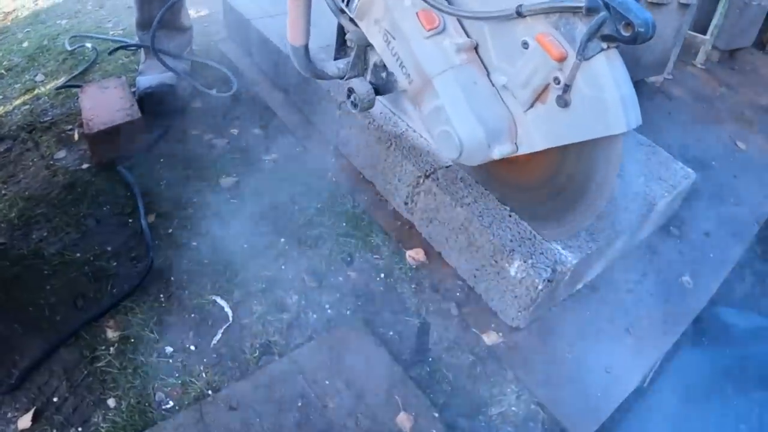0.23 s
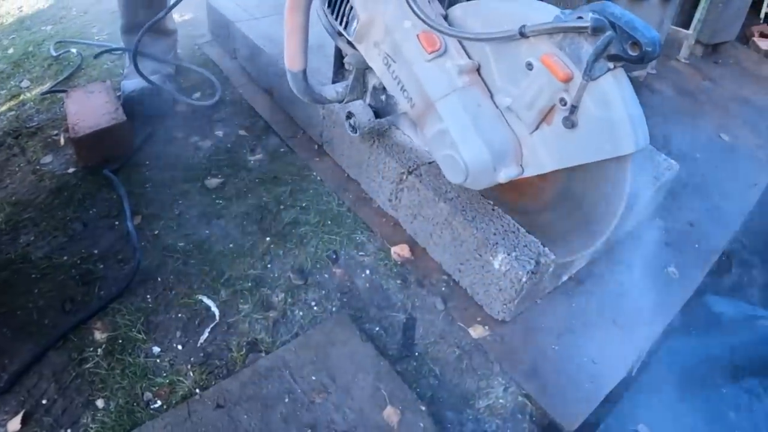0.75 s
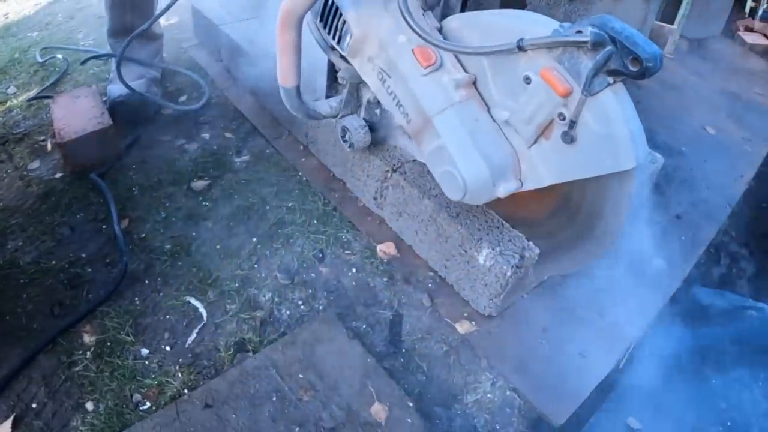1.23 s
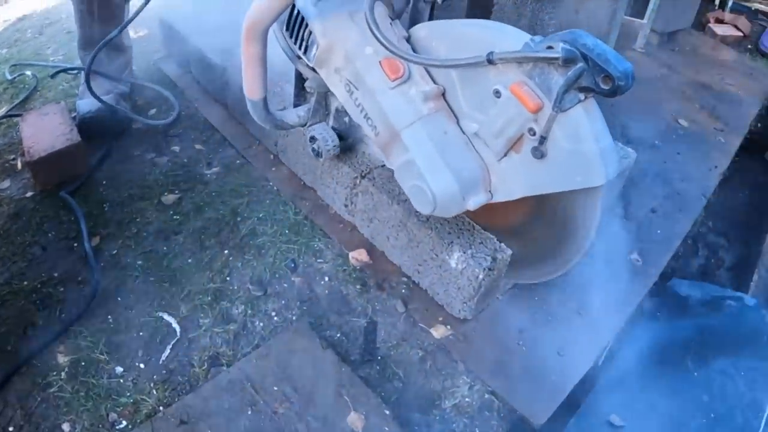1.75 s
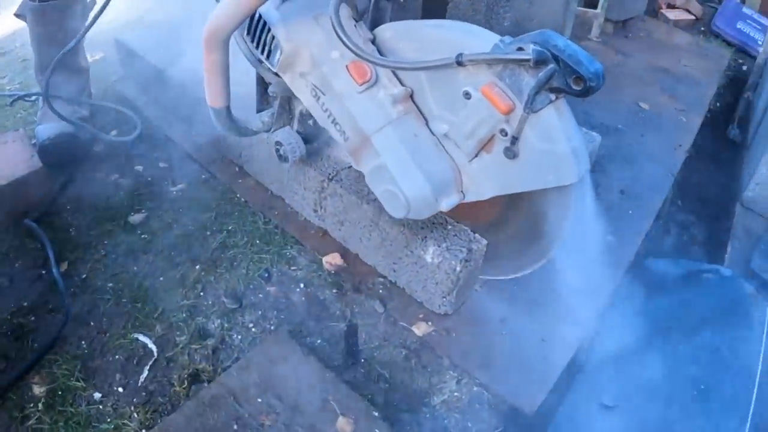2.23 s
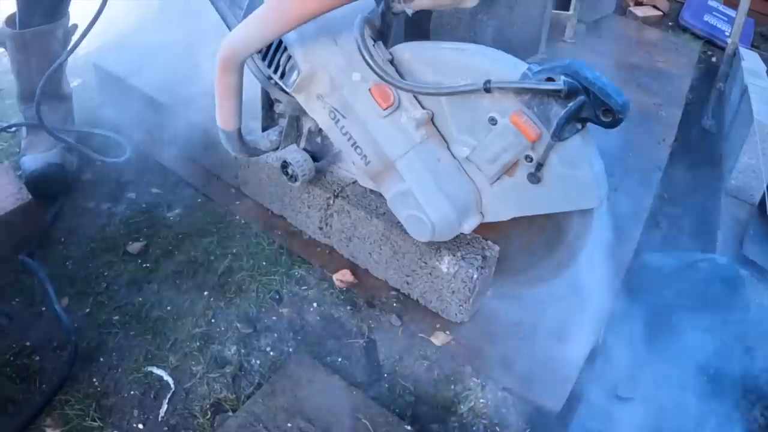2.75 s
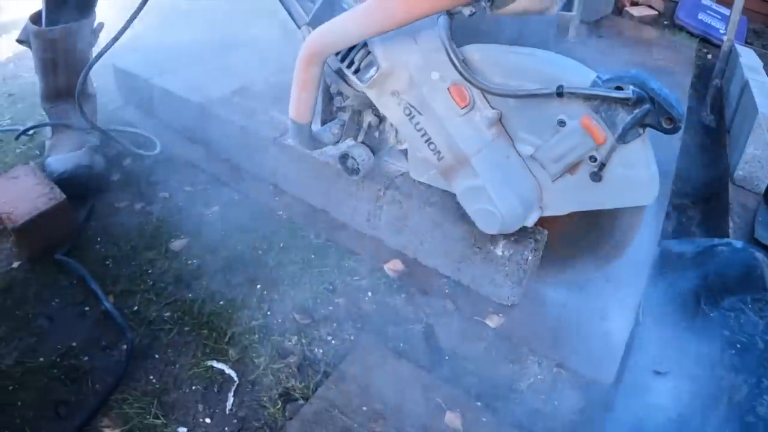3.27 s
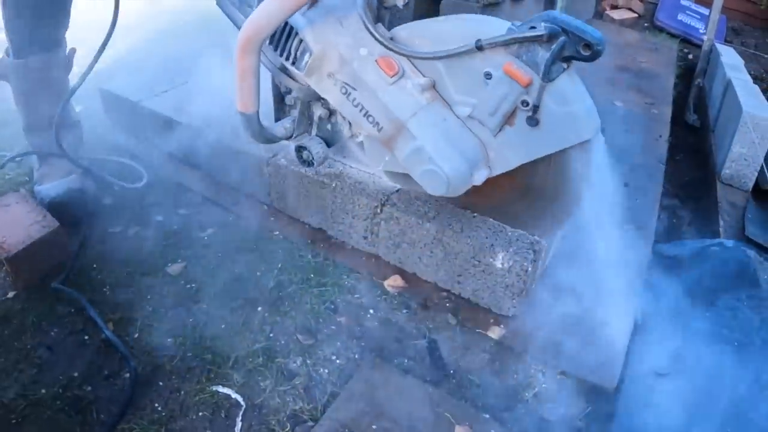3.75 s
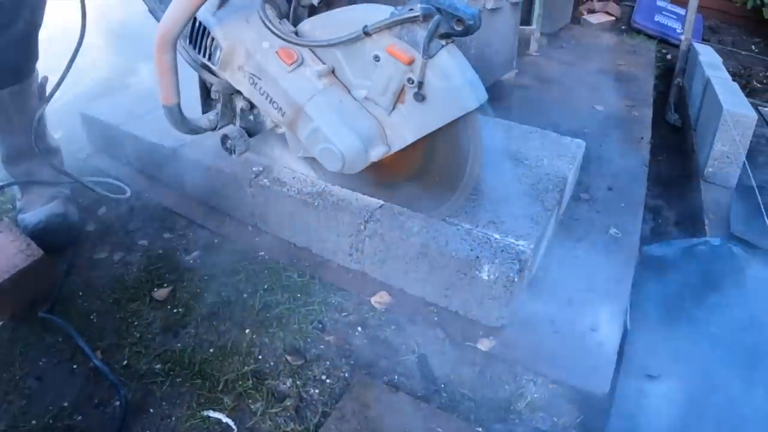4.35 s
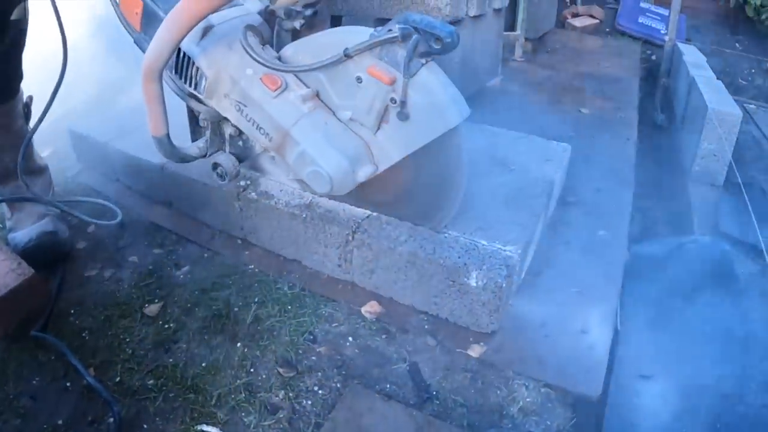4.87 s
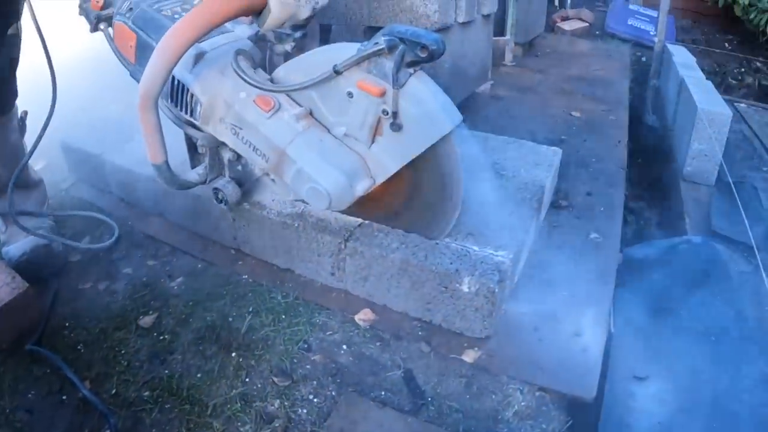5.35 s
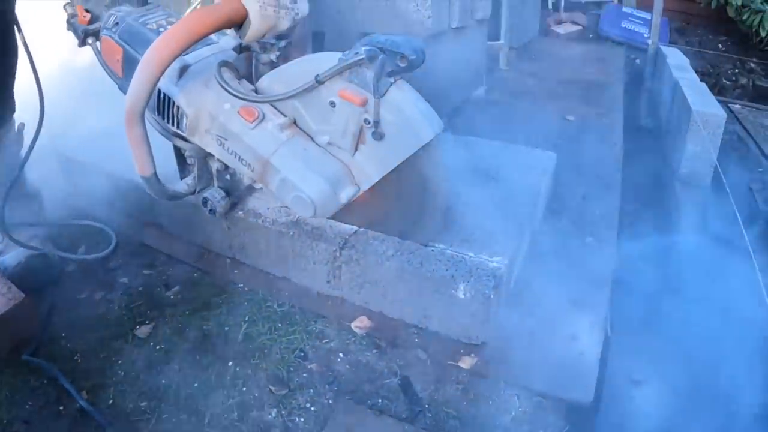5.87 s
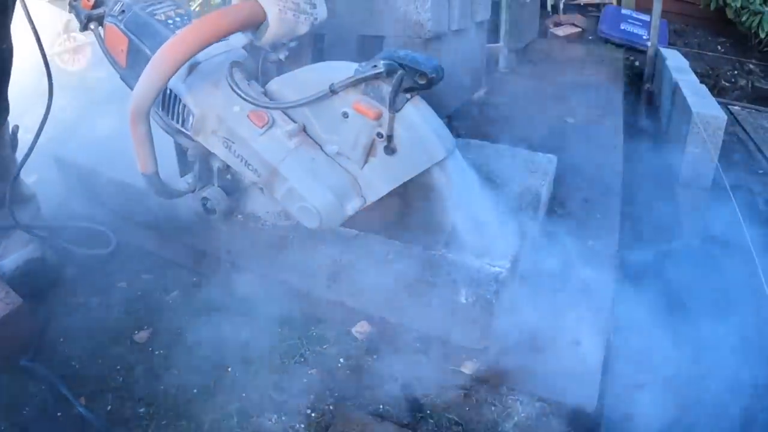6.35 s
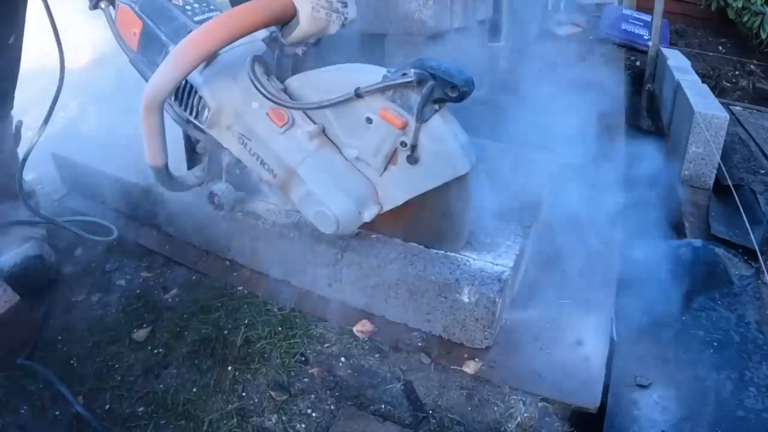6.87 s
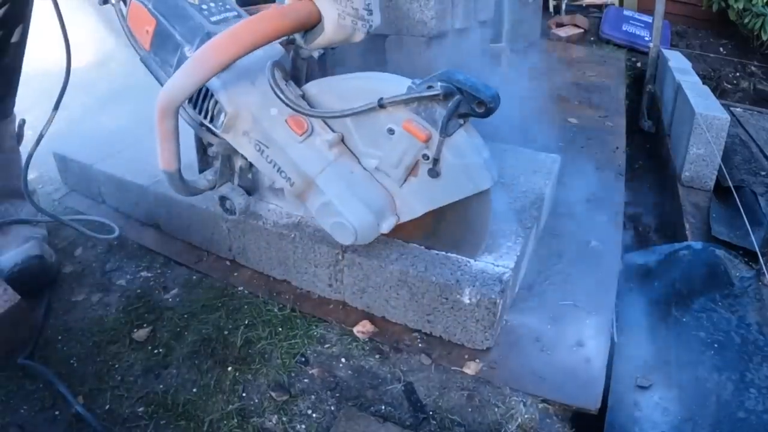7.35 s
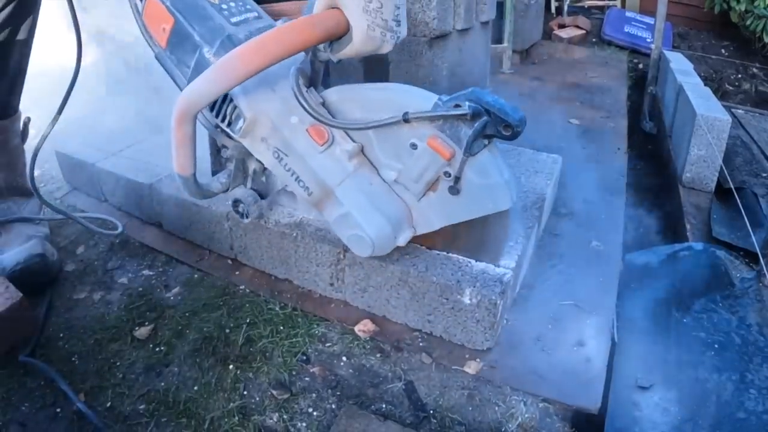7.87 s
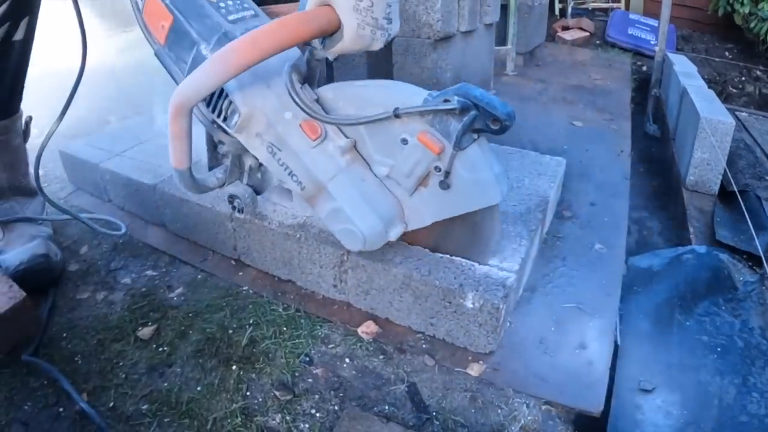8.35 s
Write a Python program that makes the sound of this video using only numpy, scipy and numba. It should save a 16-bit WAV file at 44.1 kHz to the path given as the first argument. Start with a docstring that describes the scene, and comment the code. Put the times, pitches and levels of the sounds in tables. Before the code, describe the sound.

Close, continuous shriek of a power saw cutting concrete, gritty and metallic, throbbing with each disc turn, easing off and biting in twice with chips.

```python
"""Outdoors, close to the microphone, an electric disc cutter grinds through a concrete block.
From the start grit noise rings the steel modes and hisses, throbbing with each turn; over it lie scraping,
a low rush, the guard's hum, a gear whine that sags under load, and wavering squeals.
At 3.6 s and 8.3 s the disc, running light at the edge of the block, bites in again with a burst of chips;
in between, near 5.5 and 5.8 s, the load dips briefly."""
import sys
import numpy as np
from scipy import signal
from scipy.fft import rfft, irfft, next_fast_len
from scipy.io import wavfile
from scipy.ndimage import uniform_filter1d, minimum_filter1d
from numba import njit

SR = 44100
rng = np.random.default_rng(int(sys.argv[2]) if len(sys.argv) > 2 else 0)


def int16_out(signal):
    """Quantize to a 16-bit WAV file."""
    q = np.round(np.clip(np.atleast_2d(signal).T, -1, 1) * 32767)
    wavfile.write(sys.argv[1], SR, q.astype(np.int16))


N = 379701
T = np.arange(N) / SR

# spectrum of crumbling concrete: frequency_hz [Hz], density_db [dB per Hz, relative]
GRIT_SPECTRUM = [(700, -73.5), (1600, -53.5), (2200, -53), (2500, -48), (2900, -50), (3700, -47.5),
                 (4200, -37), (5000, -39.5), (5400, -46.5), (6400, -40), (7200, -43), (8700, -44.5),
                 (9300, -49), (10700, -43.5), (12900, -51), (15600, -49)]

# each layer: level at full load, then its change when running light, deep in the slot or swung round
GRIND_DB, GRIND_LIGHT_DB, GRIND_SWUNG_DB = -23.5, -6.5, -2
DUST_DB, DUST_SWUNG_DB = -7.5, 6  # drives both the fine hiss and the overall level of the cut
DUST_HISS_DB = 8.0  # added to the above for the hiss alone
SCRAPE_DB, SCRAPE_DEEP_DB = -48, 5
RUSH_DB, RUSH_LIGHT_DB = -56.5, -3.5
GUARD_DB, GUARD_LIGHT_DB, GUARD_SWUNG_DB = -61, 5.5, 7.5
# as the cut goes on, grinding and rush fade a little; the guard hums and the block scrapes more
GRIND_DB_PER_S, RUSH_DB_PER_S, GUARD_DB_PER_S, SCRAPE_DB_PER_S = -0.17, -0.1947, 1.2, 0.3146
SCRAPE_START_DB, SINK_S = -2, 0.44  # the scraping is weaker until the rim has sunk in
# the cutter swings round and its jet of dust points at the listener for a while
SWING_AT_S, SWING_S = 3.54, 0.97
CRUISE_HZ = 44.3  # usual turn rate in the cut
RUSH_DB_PER_HZ = 0.14  # the air rushes louder the faster the disc turns
THROB_DEPTH = 0.13
EASE_CURVE = 0.34  # below 1 the load falls fastest at first
EDGE_RETURN = 0.84  # time to work back from the edge after a bite, in lengths of the easing
EDGE_CURVE, EDGE_BACK_CURVE = 0.41, 1.9  # quickly towards the edge, and quickly off it at first
BITE_DECAY_S = 0.025
LEFT_DB = 6  # the cutter's left channel over its right
TOP_HZ = 15750


def undb(db):
    """Decibels to gain."""
    return np.exp(np.asarray(db) * (np.log(10) / 20))


def curves(rows):
    """Each column of a table, after its time column, as a value per sample."""
    s, *columns = np.transpose(rows)
    return [np.interp(T, s, column) for column in columns]


def unit(x):
    """Scale to a standard deviation of 1."""
    return x / np.std(x)


def band_rms(x, lo_hz, hi_hz):
    """Rms of the part of x between two frequencies."""
    hz = np.arange(N // 2 + 1) * SR / N
    in_band = (hz > lo_hz) & (hz < hi_hz)
    return np.sqrt(2 * np.sum(np.abs(rfft(x)[in_band]) ** 2)) / N


def colour(x, points):
    """Filter by a spectrum of (Hz, dB) points, joined on a logarithmic frequency axis."""
    size = next_fast_len(N)
    hz, db = np.transpose(points)
    bins = np.maximum(np.arange(size // 2 + 1) * SR / size, 1)
    gain = undb(np.interp(np.log(bins), np.log(hz), db))
    return irfft(rfft(x, size) * gain, size)[:N]


def walk(rate):
    """A random drift of spread near 1 that takes a new value rate times a second."""
    steps = rng.standard_normal(2048)
    return np.sqrt(3 / 2) * np.interp(T * rate, np.arange(len(steps)), steps)


def bell(s, length):
    """A smooth swell around a moment, down to 1/e one length away."""
    return np.exp(-np.minimum(((T - s) / length) ** 2, 40))


def swing(x, size=441):
    """Running rms over 10 ms, kept just above zero."""
    return np.sqrt(np.abs(uniform_filter1d(x ** 2, size)) + 1e-3)


@njit
def svf(x, hz, width):
    """State-variable band-pass with a moving centre, updated every 32 samples."""
    y, band, low = np.empty(len(x)), 0., 0.
    g, k = 0., 0.
    for i in range(len(x)):
        if i % 32 == 0:
            g = np.tan(np.pi * min(hz[i] / SR, .45))
            k = np.pi * width / SR * (1 + g * g) / g
        v = (band + g * (x[i] - low)) / (1 + g * (g + k))
        band, low, y[i] = 2 * v - band, low + 2 * g * v, k * v
    return y


def ring(force, hz, width_hz):
    """A steep resonance driven by a force through two equal band-passes, at rms 1."""
    hz = hz * np.ones(N)
    once = svf(force, hz, float(width_hz))
    return unit(svf(once, hz, float(width_hz)))


def overtones(force, t60, share, turnover=1.448):
    """Countless weak modes of the steel as decaying noise; which of them speak changes as the rim moves on."""
    t = np.arange(SR // 5) / SR
    decay = np.exp(-np.log(1000) * t / t60)
    angle = np.pi / 2 * turnover * T
    blend = np.zeros(N)
    for k in range(4):
        response = rng.standard_normal(len(t)) * decay
        rings = unit(signal.oaconvolve(force, response)[:N])
        blend += rings * np.cos(angle + k * np.pi / 4) ** 2
    share = np.clip(share, 0, 1)
    return np.sqrt(1 - share) * force + np.sqrt(share) * unit(blend)


def easing():
    """Lightness of the load (1 = the rim barely touches) and how far the rim bears on the edge of the block."""
    # the rim eases off the stone, then bites in again: start_s [s], lightest_s [s], bite_time_s [s],
    # lightness [0-1], reach [0-1, 1 = at the edge of the block]
    ease_offs = [(3.063, 3.555, 0.0022, 0.65, 0.65), (5.447, 5.46, .025, 0.6, 0.75),
                 (5.736, 5.795, 0.12, 0.42, 0.25), (7.82, 8.33, .002, 0.9, 0.78)]
    light, edge = np.zeros(N), np.zeros(N)
    for start, top, bite, size, reach in ease_offs:
        back = top + bite
        light += size * np.interp(T, [start, top, back], [0, 1, 0]) ** EASE_CURVE
        way = np.interp(T, [start, top, back + EDGE_RETURN * (top - start)], [0, 1, 0])
        edge += reach * way ** np.where(T < top, EDGE_CURVE, EDGE_BACK_CURVE)
    return light, edge


def throb(turns, depth, second=0.29, third=0.22, fourth=0.26, uneven=0.38):
    """The rim is not quite round, so its pressure peaks in a few places each turn; these shift as it cuts."""
    lobes = np.zeros(N)
    for k, size in enumerate([1, second, third, fourth]):
        lobes += size * np.cos(2 * np.pi * ((k + 1) * turns + uneven * walk(1.93)))
    return np.exp(depth * lobes - depth ** 2)


def disc(deep, edge, dust, wander=0.0018, swell_db=1.5, flicker_db=2.0, lock=0.028):
    """Diamond grains strike the stone and ring each mode as strongly as the place of contact allows."""
    # modes of the disc: frequency_hz [Hz], width_hz [Hz, each band-pass], then relative level by contact:
    # top_db [dB], half_deep_db [dB], deep_db [dB], edge_db [dB]
    disc_modes = [(2078,250,-30,-22,-18.5,-16.5), (2304,140,-35,-16,-35,-33),
                  (2468,217,-14.5,-19.5,-16,-11), (2604,123,-13,-28,-25,-24), (2760,140,-23,-26,-25,-17),
                  (3040,240,-19.5,-26,-21,-19), (3290,95,-20,-18,-28,-12), (3350,130,-22.5,-20.5,-18,-13),
                  (3555,180,-17,-17,-14,-10), (3877,179,-33,-20.5,-19.5,-9.5), (4022,275,-11,-13,-13,-7.5),
                  (4261,164,-11.5,-12,-14.5,-7.5), (4406,194,-13.5,-15.5,-14,-7.5),
                  (4622,78,-14.5,-29,-22,-27), (4785,220,-9.5,-19,-10,-10.5), (5000,190,-15.5,-21,-20,-15),
                  (5227,230,-13,-13,-12.5,-13), (5480,130,-27,-16,-14,-13), (5600,170,-14,-23,-16,-16),
                  (5790,220,-12,-10,-14.5,-17), (6206,120,-14,-17.5,-17,-15), (6425,400,-8.5,-19,-13.5,-19),
                  (6600,79,-14,-14.5,-30,-27.5), (6890,280,-16.5,-13,-16,-24), (7510,290,-13,-17.5,-16,-23),
                  (7760,160,-12.5,-17,-22,-22), (7863,125,-29,-11,-13.5,-33), (8090,230,-14,-18.5,-18,-24),
                  (8526,210,-11,-20,-32.5,-32), (8810,480,-12,-15,-11.5,-11), (9590,250,-20.5,-25,-28,-27),
                  (9760,260,-18.5,-21.5,-20.5,-27), (10800,250,-17,-32.5,-34,-16),
                  (11260,170,-25,-37,-36,-29.5), (12140,344,-19,-23,-30,-23), (13380,400,-18,-21,-20,-14),
                  (14400,650,-15.5,-16,-21,-14.5)]
    out = np.zeros(N)
    force = overtones(rng.standard_normal(N), t60=0.2, share=0.6, turnover=1.5)
    drift = 1 + wander * walk(3.2)
    for hz, width_hz, *by_depth_db, at_edge_db in disc_modes:
        # each mode hears the same force from another moment
        mode = ring(np.roll(force, rng.integers(N)), hz * drift, width_hz)
        # friction feeds a ringing mode and also caps it, which steadies its swing
        mode = unit(mode / swing(mode) ** lock)
        in_slot = np.interp(deep, [0, .5, 1], undb(by_depth_db) ** 2)
        at_edge = undb(at_edge_db) ** 2
        strength = np.sqrt(in_slot + (at_edge - in_slot) * np.clip(edge, 0, 1))
        flutter = undb(swell_db * walk(4) + flicker_db * walk(22))
        out += mode * strength * flutter * (dust if hz > 9200 else 1)
    return out


def grit(edge, dust, grain_db=2, edge_db=-6):
    """Dense cracks of crumbling concrete, duller at the edge of the block; the finest dust makes the top hiss."""
    grain = np.repeat(rng.standard_normal(N // 16 + 1), 16)[:N]
    cracks = unit(rng.standard_normal(N) * undb(grain_db * grain))
    hiss = colour(overtones(cracks, t60=.1, share=.5), GRIT_SPECTRUM) * np.sqrt(SR / 2)
    sharp = signal.sosfiltfilt(signal.butter(6, 5200, "high", fs=SR, output="sos"), hiss)
    fine = signal.sosfiltfilt(signal.butter(6, 9200, "high", fs=SR, output="sos"), hiss)
    return hiss - sharp + undb(edge_db * edge) * (sharp - fine) + dust * fine


def block(pressure, flicker_db=0.83):
    """The rim scrapes the slot and shakes the block and the housing: throbbing noise in a set spectrum."""
    # spectrum of the scraped block: frequency_hz [Hz], level_db [dB, relative]
    block_spectrum = [(300, -48), (600, -21), (800, -15), (1000, -12), (1200, -13), (1380, -6.5),
                      (1560, -8.5), (1750, -4), (2000, -3), (2200, -7), (2400, -7.5), (2900, -4.5),
                      (3400, -4), (5000, -54)]
    force = overtones(rng.standard_normal(N), t60=0.048, share=0.46, turnover=1.203)
    scrape = colour(pressure * force, block_spectrum)
    return scrape / band_rms(scrape, 1200, 2200) * undb(flicker_db * walk(14))


def gears(turns, whine_db, speed, runout=0.32, flicker_db=2.5, slack_per_hz=0.035, tight_hz=43):
    """The gear mesh whines; run-out adds sidebands one turn rate apart; the teeth rattle when the disc is fast."""
    teeth, jitter = 23, .075  # jitter in cycles of the whine
    rattle = jitter + slack_per_hz * np.maximum(speed - tight_hz, 0)
    mesh = np.sin(2 * np.pi * (teeth * turns + rattle * walk(130)))
    wobble = 1 + runout * np.cos(2 * np.pi * turns)
    return undb(whine_db) * unit(mesh * wobble * undb(flicker_db * walk(17)))


def blade_guard():
    """The blade guard hums: one noise shakes a few broad resonances."""
    # modes of the blade guard: frequency_hz [Hz], width_hz [Hz, each band-pass], level_db [dB, relative]
    guard_modes = [(547, 110, -10), (863.4, 100, -0.5), (1030, 120, -8.5), (2050, 260, -19)]
    shake = rng.standard_normal(N)
    return sum(undb(db) * ring(shake, hz, width_hz) for hz, width_hz, db in guard_modes)


def rumble(bass_db=0):
    """The low rush of the machine and of the air that the disc drags round; its bass can drop on its own."""
    # spectrum of machine and air: frequency_hz [Hz], level_db [dB, relative]
    rush_spectrum = [(12, -40), (25, -29), (50, -14), (80, -6), (125, -0.5), (250, -0.5), (400, -2),
                     (700, -1), (1200, -2), (2500, -15)]
    rush = colour(rng.standard_normal(N), rush_spectrum)
    rush = rush / band_rms(rush, 70, 400)
    bass = signal.sosfiltfilt(signal.butter(4, 290, fs=SR, output="sos"), rush)
    return rush + (undb(bass_db) - 1) * bass


def squeals(flicker_db=3.0, waver_per_s=150):
    """Unsteady tones of the rubbing steel, each wavering in pitch on its own."""
    # a mode locks on and sings for a while: middle_s [s], length_s [s, middle to 1/e], pitch_hz [Hz],
    # waver_hz [Hz], level_db [dB, relative]
    squeal_tones = [(0.198, 0.33, 2310, 17, -44), (.3, 0.86, 5760, 32, -36),
                    (0.795, 0.15, 1334, 7.4, -48.5), (1.55, 0.48, 1335, 29, -50), (1.1, 1, 2610, 35, -36.5),
                    (1.2, 0.86, 3322, 20.1, -38), (1.074, 0.031, 4040, 15, -29),
                    (1.15, 0.35, 4100, 25, -49), (.8, .6, 5240, 35, -38), (.4, 0.6, 6700, 35, -40),
                    (1.2, 0.44, 8050, 23, -44), (1.569, .06, 3296, 27, -33), (2.05, 0.45, 2540, 28.5, -40),
                    (2.248, 0.304, 3280, 27, -38.5), (2.17, 0.053, 4160, 45, -30),
                    (2.6, 0.23, 3690, 35, -37), (2.8, 0.21, 1990, 33, -39.5), (2.97, 0.23, 4830, 66, -34.5),
                    (3.613, 0.042, 2545, 75, -35), (3.72, 0.093, 4280, 38, -44),
                    (3.812, 0.12, 2590, 55, -32), (4.178, 0.1, 2590, 22, -37), (3.86, .14, 6560, 26, -34),
                    (4.27, 0.25, 3535, 18, -36), (4.5, 0.47, 6530, 29, -33), (4.5, 0.32, 7630, 31, -33),
                    (4.908, 0.14, 6140, 28, -28), (5, .3, 5800, 27, -35), (5.202, 0.32, 4020, 25, -34),
                    (6, 0.25, 5120, 30, -44), (6.1, .3, 4970, 60, -32), (5.4, .9, 2627, 45, -41.5),
                    (6.75, .35, 4430, 57, -33), (6.9, 0.25, 6330, 45, -36), (7, 0.26, 1775, 24, -47),
                    (7.15, 0.24, 4230, 63, -33), (7.45, .55, 3860, 55, -36.5),
                    (7.8, 0.14, 3380, 22.5, -36.5), (7.6, 0.65, 2460, 22, -41.5),
                    (8.276, 0.049, 2080, 17, -38), (8.291, .009, 868, 17, -34), (8.48, 0.1, 2440, 29, -51),
                    (8.56, 0.0065, 4280, 34, -29)]
    waver, flicker, out = walk(waver_per_s), undb(flicker_db * walk(45)), np.zeros(N)
    for s, length, hz, spread_hz, db in squeal_tones:
        near = np.flatnonzero(np.abs(T - s) < 2.5 * length)
        own = (near + rng.integers(N)) % N  # its own stretch of waver and flicker
        phase = 2 * np.pi * np.cumsum(hz + spread_hz * waver[own]) / SR
        swell = np.exp(-((T[near] - s) / length) ** 2)
        out[near] += np.sqrt(2) * undb(db) * swell * flicker[own] * np.sin(phase)
    return out


def bites():
    """The rim catches the stone: a burst of chips that starts at once and dies quickly."""
    # the rim catches the stone again: start_s [s], level_db [dB]
    catches = [(3.559, -21.5), (8.331, -24)]
    chips = unit(colour(rng.standard_normal(N), GRIT_SPECTRUM))
    return chips * sum(undb(db) * (T >= s) * np.exp(-np.abs(T - s) / BITE_DECAY_S) for s, db in catches)


def scene(hand_db=-0.03, gust_db=1.17):
    """The cutter as one close source, louder on the left; load, depth and turn rate shape its layers."""
    # the disc slows under load and its gears whine: time_s [s], turn_rate_hz [Hz], whine_db [dB]
    speed_rows = [(0, 45.8, -62), (.4, 45.4, -57), (.7, 42.9, -56), (1.05, 44.3, -55), (1.3, 45.7, -55),
                  (1.55, 46.2, -51), (1.8, 44.9, -52), (2.0, 41.8, -53), (2.3, 38.8, -54),
                  (2.56, 36.2, -46.5), (2.8, 37.4, -46), (3.0, 38.5, -43.5), (3.2, 42.3, -46),
                  (3.36, 46, -44.5), (3.5, 49, -49), (3.65, 49.5, -60), (5.9, 49, -68), (6.6, 47, -63),
                  (7.3, 45.4, -55.5), (7.75, 45.3, -58), (7.95, 44.8, -51.5), (8.12, 43.1, -48),
                  (8.24, 41.8, -50), (8.33, 45, -56), (8.61, 45.5, -58)]
    # how deep the rim runs: time_s [s], depth [0 = on top of the block, 1 = deep in the slot]
    slot_rows = [(0, .48), (.5, .48), (1.6, .7), (2.1, 1), (3, 1), (3.5, .5), (3.75, 0), (5.6, 0),
                 (6.4, .08), (7, .42), (7.8, .52), (8.3, .5), (8.61, .3)]
    # the grinding and its hiss briefly dip or swell: middle_s [s], length_s [s, middle to 1/e], change_db [dB]
    level_dip_rows = [(3.548, 0.011, -4), (5.461, 0.012, -1), (1.47, 0.054, -0.5), (3.43, 0.053, 0.5),
                      (3.66, 0.05, -1), (5.79, .04, -1), (7.92, 0.056, 0), (5.968, 0.026, 0.5),
                      (8.103, 0.038, 1.5), (8.24, 0.047, -1.5), (8.6, 0.037, -1.5)]
    # the bass of the rush drops briefly: middle_s [s], length_s [s, middle to 1/e], change_db [dB]
    lull_rows = [(3.25, 0.32, -6), (5.84, 0.07, -12), (8.15, 0.62, -3)]
    speed, whine_db = curves(speed_rows)
    deep, = curves(slot_rows)
    turns = np.cumsum(speed) / SR
    light, edge = easing()
    swung = bell(SWING_AT_S, SWING_S)
    level_dip_db = sum(db * bell(s, length) for s, length, db in level_dip_rows)
    lull_db = sum(db * bell(s, length) for s, length, db in lull_rows)

    grind_db = GRIND_DB + GRIND_LIGHT_DB * light + GRIND_SWUNG_DB * swung
    grind_db += GRIND_DB_PER_S * T + hand_db * walk(5.4) + level_dip_db
    dust_db = DUST_DB + DUST_SWUNG_DB * swung + level_dip_db
    scrape_db = SCRAPE_DB + SCRAPE_DEEP_DB * deep
    scrape_db += SCRAPE_DB_PER_S * T + SCRAPE_START_DB * bell(0, SINK_S)
    rush_db = RUSH_DB + RUSH_DB_PER_HZ * (speed - CRUISE_HZ) + RUSH_LIGHT_DB * light
    rush_db += RUSH_DB_PER_S * T + gust_db * walk(11)
    guard_db = GUARD_DB + GUARD_LIGHT_DB * light + GUARD_SWUNG_DB * swung + GUARD_DB_PER_S * T

    pressure = throb(turns, THROB_DEPTH)
    dust = undb(dust_db + DUST_HISS_DB)
    cut = undb(-0.8) * disc(deep, edge, dust) + undb(-0.2) * grit(edge, dust)
    # all modes draw on the same friction, so one swells at the cost of the others
    cut *= (np.sqrt(1 + undb(dust_db) ** 2) / swing(cut)) ** .5
    cutter = undb(grind_db) * pressure * cut
    cutter += undb(scrape_db) * block(pressure)
    cutter += gears(turns, whine_db, speed)
    cutter += undb(guard_db) * blade_guard()
    cutter += undb(rush_db) * rumble(lull_db)
    cutter += undb(-1.0) * squeals()
    cutter += bites()
    # the rush of air differs a little between the sides
    side = undb(rush_db - 17.0) * rumble(lull_db)
    left = undb(LEFT_DB)
    return np.array([left * cutter, cutter]) * 2 / (1 + left) + np.array([side, -side])


def record(dry):
    """The recorder's fast limiter rounds off the highest peaks; the top is cut steeply."""
    ceiling = .25
    allowed = np.minimum(1, ceiling / (np.abs(dry).max(axis=0) + 1e-9))
    gain = uniform_filter1d(minimum_filter1d(allowed, size=45), size=45)  # about 1 ms
    top_cut = signal.ellip(12, .1, 90, TOP_HZ, fs=SR, output="sos")
    return signal.sosfilt(top_cut, dry * gain)


dry = scene()
out = record(dry)
int16_out(out)
```